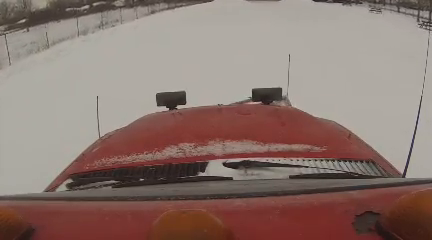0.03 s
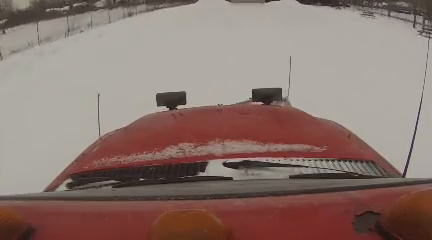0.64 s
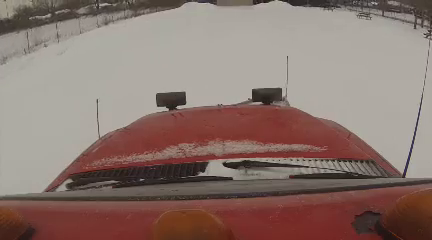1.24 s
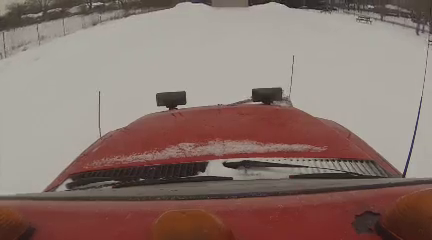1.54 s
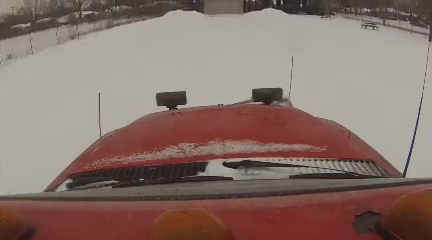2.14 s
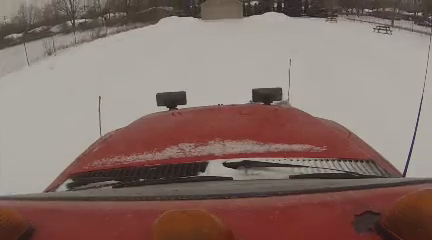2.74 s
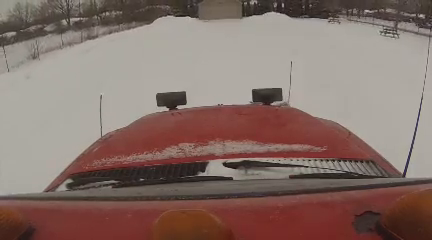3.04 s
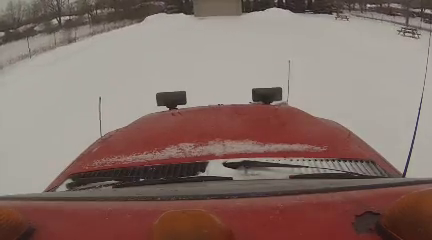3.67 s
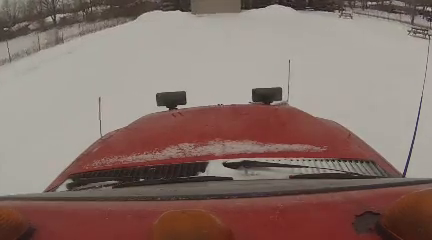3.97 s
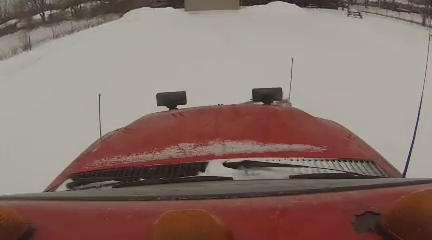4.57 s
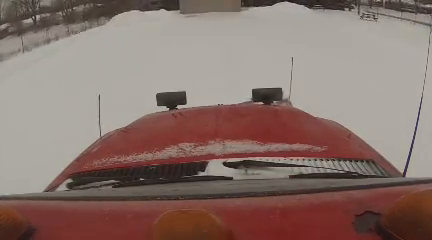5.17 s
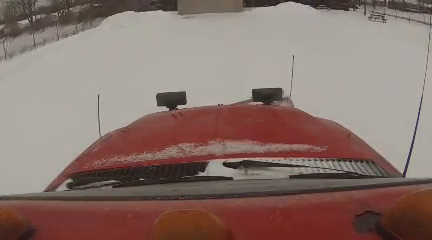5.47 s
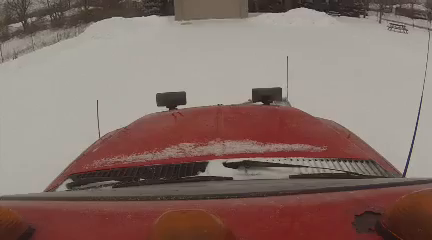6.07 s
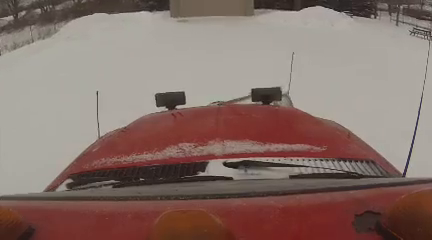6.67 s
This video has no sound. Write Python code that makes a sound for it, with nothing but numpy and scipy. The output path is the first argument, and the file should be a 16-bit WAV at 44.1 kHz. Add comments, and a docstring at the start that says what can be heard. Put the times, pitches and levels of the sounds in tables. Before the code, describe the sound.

A truck engine pulls under load with a throbbing exhaust and whining gears, shifts up, then eases off. Throughout, its plow blade drones and scrapes over packed snow, clanking and thudding at bumps, most often near the end. The microphone rides outdoors on the cab roof, which booms over the low chassis rumble, while a few ice grains tick against it.

```python
"""Snow plough from the cab roof

A plough truck pushes snow across an open lot; one microphone rides on the cab roof.
The engine pulls, shifts up and eases off, its exhaust throbbing under whining gears and a faint turbo.
Out in front the blade drones and scrapes over packed snow, and its mounting clanks at each jolt.
Right under the microphone the roof booms, the chassis rumbles below, and ice grains tick on the housing."""
import sys
import numpy as np
from scipy import signal
from scipy.fft import rfft, irfft, next_fast_len
from scipy.io import wavfile
from scipy.ndimage import uniform_filter1d

SR = 44100
rng = np.random.default_rng(int(sys.argv[2]) if len(sys.argv) > 2 else 0)


def transcribe(u):
    """Save the signal u as a 16-bit wav file named by the first command-line argument.

    u: samples, shape (n,) or (channels, n), limited to [-1, 1]; the rate is SR.
    q: integer samples, one column per channel.
    """
    v = np.clip(np.atleast_2d(u).T, -1, 1)
    q = np.round(v * 32767).astype(np.int16)
    wavfile.write(sys.argv[1], SR, q)


N = 304731
TIME = np.arange(N) / SR

# modes of the chassis: pitch_hz, width_hz, level_db
CHASSIS_MODES = [(55.94, 7.9, -1), (64.1, 12, -0.5), (73, 19, -16.5)]
# the blade's lesser modes: pitch_hz, width_hz, level_db
BLADE_MODES = [(160, 11, 1), (182.7, 13, -1.5), (204, 11, -1), (237, 17, -15), (285.8, 24, -16),
               (324, 100, -26)]


def engine(speed_wander=0.001):
    """Engine speed and load drive the exhaust, gears, intake and the roar of the bay."""
    # engine speed, climbing to the gear change and sagging after it: time_s, firing_hz
    speed = [(0, 116.1), (.25, 118.4), (.5, 121.3), (1.2, 124.9), (1.8, 127.9), (2.25, 131.3), (2.5, 130.5),
             (2.9, 110.5), (3.15, 104.9), (3.5, 104.7), (4.2, 104.2), (5.6, 102.6), (6.5, 96.5),
             (6.91, 94.26)]
    # engine load, as the level of the roar: time_s, level_db
    load = [(0, -37.5), (1.8, -38.4), (2.4, -36.5), (2.9, -38), (3.4, -38.5), (3.75, -39.5), (4.06, -38.5),
            (4.14, -42.5), (4.45, -45), (5.05, -48.5), (5.56, -45.5), (6.15, -47)]
    firing_hz, = in_time(speed)
    load_db, = in_time(load)
    easing_db = load_db - load_db.max()  # zero at full load
    firings = np.cumsum(firing_hz * (1 + speed_wander * drift(6.86))) / SR
    phase = 2 * np.pi * firings
    tones = exhaust(firing_hz, phase, easing_db) + gears(firing_hz, phase, easing_db) + intake(phase)
    return np.sqrt(2) * tones + from_db(load_db) * engine_bay(firings, easing_db)


def exhaust(firing_hz, phase, easing_db, level_db=-37, load_follow=2.1):
    """Tones of the firing rate, each lifted when it meets a resonance of the pipe."""
    # exhaust tones: firing_multiple, level_db
    orders = [(0.502, -20.5), (1, 0), (1.255, -30), (1.503, -7.5), (1.748, -17.5), (1.999, -1.5),
              (2.25, -24), (2.752, -26), (3.998, -31), (5, -24)]
    # pipe resonances: pitch_hz, half_width_hz, lift_db
    pipe = [(102.94, 4.1, 14), (124.34, 1.9, 10.5)]
    tones = 0
    for order, db in orders:
        pipe_db = sum(lift / (1 + ((order * firing_hz - hz) / width) ** 2) for hz, width, lift in pipe)
        tones += from_db(db + pipe_db) * np.sin(order * phase + 2 * np.pi * rng.random())
    return from_db(level_db + load_follow * easing_db) * tones


def gears(firing_hz, phase, easing_db, load_follow=0.74, waver_db=2.5, wobble_turns=0.028):
    """Each gear tone follows the engine and sings out as it passes a resonance of the casing."""
    # gear tones: firing_multiple, level_db
    orders = [(8.25, -3), (8.5, 0.5), (8.75, -3), (9.5, -4.5), (9.75, -9), (10, -8), (10.5, -1),
              (10.75, -8), (11, -4.5), (11.25, -7.5), (11.5, -2.5), (12, -5), (12.5, -7.5)]
    # casing resonances: pitch_hz, width_hz, level_db
    casing = [(1075, 30, -52), (1201, 16, -45.5), (1234, 34, -46), (1327, 21, -46.5), (1409, 65, -45.5),
              (1510, 44, -49.5), (1630, 110, -44)]
    whine = 0
    for order, db in orders:
        power = sum((from_db(peak_db) / (1 + (2 * (order * firing_hz - hz) / width) ** 2)) ** 2
                    for hz, width, peak_db in casing)
        gain = np.sqrt(power) * from_db(db + waver_db * drift(3.2))
        wobble = 2 * np.pi * (rng.random() + wobble_turns * drift(13))
        whine += gain * np.sin(order * phase + wobble)
    return from_db(load_follow * easing_db) * whine


def intake(phase):
    """The intake hums at three times the firing rate."""
    # swells of the hum: start_s, hold_s, level_db
    hums = [(-.1, 0.14, -41.5), (2.695, 0.091, -46), (5.707, 1, -41.5)]
    return swelling(hums, steady_db=-54, attack_s=0.08, release_s=0.3) * np.sin(3 * phase)


def engine_bay(firings, easing_db, throb=0.11, ring_follow=0.089, song_follow=0.95, flutter_db=3):
    """Fan and valve gear roar, pulsing with each firing; under load parts ring more and the intake sings."""
    # colour of the roar: frequency_hz, density_db
    colour = [(300, -11.5), (900, -11.5), (1160, -11.5), (1290, -1), (1500, 0), (1780, -7), (2380, -8),
              (2850, -19.5), (3850, -25.5), (5200, -22.5), (5850, -36.5), (6700, -25), (7500, -34.5),
              (14000, -50.5)]
    # ringing engine parts: pitch_hz, width_hz, level_db
    part_modes = [(1193, 16, -18), (1219, 13, -15), (1425, 40, -17.5), (1475, 130, -16.5), (1927, 140, -12),
                  (2271, 100, -14), (3416, 33, -23.5), (3514, 20, -29), (4044, 59, -29), (8530, 380, -37.5)]
    # the intake's song at full load: pitch_hz, width_hz, level_db
    song_mode = [(5060, 190, -23.5)]
    valves = from_db(-3) * valve_gear(firings / 8)  # eight firings to an engine cycle
    fan = rng.standard_normal(N)
    roar = from_db(-2) * coloured(valves + fan, colour)
    ringing = from_db(-0.3 + ring_follow * easing_db) * resonances(part_modes)
    song = from_db(song_follow * easing_db + flutter_db * drift(14)) * resonances(song_mode)
    return (roar + ringing + song) * (1 + throb * np.cos(2 * np.pi * firings))


def valve_gear(cycles, change_hz=0.95, size=1024, count=4):
    """A fine clatter comes round with every engine cycle; its pattern shifts while its level holds."""
    patterns = rng.standard_normal((count, size))
    shares = np.array([drift(change_hz) for _ in patterns])
    shares /= np.sqrt(np.sum(shares ** 2, axis=0))
    clatters = [np.interp(cycles % 1, np.arange(size) / size, pattern, period=1) for pattern in patterns]
    return rms_one(np.sum(shares * clatters, axis=0))


def blade_drone(pile_db_per_s=0.5, unsteady_db=2.34, judder_follow=0.31):
    """Dragging shakes the blade, harder as snow piles up before it."""
    # the blade grabs and judders: start_s, hold_s, level_db
    judders = [(0.326, 0.18, -30.5), (0.761, 0.23, -22.5), (1.26, 0.077, -19.5), (1.485, 0.23, -24),
               (1.977, 0.0096, -17), (2.254, 0.046, -19.5), (2.979, 0.14, -21), (3.207, 0.11, -20),
               (4.654, 0.21, -23.5), (4.726, 0.011, -19.5), (5.383, 0.19, -19), (6.588, 0.12, -17.5),
               (6.682, 0.02, -21.5)]
    # its main note: pitch_hz, width_hz, level_db
    main_mode = [(191.6, 5.4, .5)]
    drag_db = -29 + pile_db_per_s * TIME + unsteady_db * drift(5.1)
    shaking = swelling(judders, drag_db, attack_s=0.03, release_s=0.16)
    # friction keeps the main note going; the lesser modes swell less with each judder
    note = from_db(-3) * shaking * evened(resonances(main_mode), 0.02)
    lesser_gain = from_db(-4.5) * shaking.mean() * (shaking / shaking.mean()) ** judder_follow
    return note + lesser_gain * evened(resonances(BLADE_MODES), 0.076)


def edge_scrape(pile_db_per_s=1.0, lumpy_db=3):
    """The cutting edge rings as lumps of snow break under it, louder as the pile grows."""
    # the edge bites into packed snow: start_s, hold_s, level_db
    bites = [(0.424, 0.17, -42.5), (0.98, 0.021, -42.5), (1.276, 0.16, -42), (2.147, 0.49, -41),
             (2.729, 0.22, -39), (3.147, 0.21, -39), (3.488, 0.14, -56), (3.918, 0.27, -38.5),
             (4.506, 0.017, -37.5), (4.649, 0.068, -37), (4.875, 0.28, -41), (5.277, 0.19, -43),
             (6.521, 0.15, -54)]
    # modes of the edge: pitch_hz, width_hz, level_db
    edge_modes = [(418.6, 11, 2.5), (467, 38, 2), (590, 58, -12.5), (605.4, 19, -2), (666, 15, -6.5),
                  (819, 32, -10), (1296, 77, -7), (1470, 99, -4)]
    # snow rushing under the blade: frequency_hz, density_db
    snow_colour = [(40, 6), (110, 22), (240, 11.5), (330, 10), (400, -6.5), (520, -6.5), (750, -24),
                   (1000, -11.5), (2000, -15.5), (3700, -25.5), (7000, -41.5), (15000, -58)]
    biting = swelling(bites, steady_db=-50.5 + pile_db_per_s * TIME, attack_s=0.013, release_s=0.1)
    edge = from_db(-3) * evened(resonances(edge_modes), 0.035)
    snow = from_db(4) * noise(snow_colour)
    return biting * from_db(lumpy_db * drift(25)) * (edge + snow)


def push_frame():
    """The push frame groans on one low note under strain."""
    # groans: start_s, hold_s, level_db
    groans = [(1.277, 0.04, -22.5), (3.17, .04, -44), (4.398, 0.12, -27), (5.235, 0.059, -25),
              (5.433, 0.014, -28.5), (5.68, 0.086, -38.5), (6.38, 0.04, -27), (6.684, 0.04, -23.5)]
    # the frame's note: pitch_hz, width_hz, level_db
    frame_mode = [(140.6, 3.5, 0)]
    strain = swelling(groans, steady_db=-40, attack_s=0.03, release_s=0.16)
    return strain * evened(resonances(frame_mode), 0.03)


def jolts(thud_lag_s=0.011, thud_width_s=0.006, thud_hz=270, rattle_db=1, part_width_ratio=0.074):
    """The mounting clanks and rattles, a loose part rings, then the heavy frame answers with a thud."""
    # plough jolts: time_s, thud_db, clatter_db, clank_db, part_hz, part_db, width_s
    knocks = [(1.32, -17, -41, -40, 1900, -39, 0.011), (1.538, -34, -52, -48, 645, -38, 0.0087),
              (1.557, -29, -50, -37.5, 410, -38.5, 0.016), (2.187, -17, -52, -45, 600, -52, 0.0082),
              (4.994, -31, -53, -44, 671, -45.5, .022), (5.348, -41, -56, -46.5, 1280, -48, .022),
              (5.468, -15, -53, -48, 620, -45, 0.017), (5.594, -41, -45, -42, 1430, -43.5, 0.0086),
              (5.748, -37, -55, -48, 1483, -42, 0.014), (6.308, -30, -35, -37, 1476, -39, 0.0048),
              (6.323, -13, -38, -45, 3600, -54, 0.0065), (6.538, -14.5, -47, -49, 3720, -59, 0.0072),
              (6.555, -16.5, -43, -44, 2080, -40, 0.0095), (6.634, -10.5, -41.5, -56, 1520, -52, 0.014),
              (6.665, -20, -48, -58, 1750, -41, 0.0056), (6.699, -14, -43, -46, 1334, -54, 0.0097),
              (6.714, -13, -43, -41, 1880, -51, 0.015), (6.844, -22, -45, -52, 3730, -56, 0.0068)]
    # colour of the clatter: frequency_hz, density_db
    clatter_colour = [(200, 12), (500, 1), (950, 3), (1450, 9), (2400, -2.5), (3000, -10), (5200, -14.5),
                      (8000, -34), (14000, -43)]
    # modes of the blade mount: pitch_hz, width_hz, level_db
    mount_modes = [(437, 5.8, -5), (470, 95, -4), (630, 26, -4.5), (830, 70, -13)]
    thud, clatter, clank, parts = np.zeros((4, N))
    for time_s, thud_db, clatter_db, clank_db, part_hz, part_db, width_s in knocks:
        contact = np.exp(-0.5 * ((TIME - time_s) / width_s) ** 2)
        clatter += from_db(clatter_db) * contact
        clank += from_db(clank_db) * contact
        loose_part = evened(resonances([(part_hz, part_width_ratio * part_hz, 0)]), 0.017)
        parts += from_db(part_db) * contact * loose_part
        thud += from_db(thud_db) * np.exp(-0.5 * ((TIME - time_s - thud_lag_s) / thud_width_s) ** 2)
    frame = evened(resonances(CHASSIS_MODES) + resonances(BLADE_MODES), 0.01)
    mount = evened(resonances(mount_modes), 0.015)
    rattle = noise(clatter_colour) * from_db(rattle_db * drift(150))
    return thud * lowpass(frame, thud_hz, order=4) + clank * mount + parts + clatter * rattle


def cab(wander=0.023, waver_db=0.7, sway_hz=24, sway_width_hz=10, sway_db=-27):
    """The roof under the microphone flexes at its lowest resonance and booms over the sway of the cab."""
    # the roof's resonance: time_s, pitch_hz
    roof_pitch = [(0.0, 29.86), (0.42, 28.7), (1.99, 30.06), (2.8, 30.35), (2.92, 27.57), (3.24, 27.88),
                  (3.6, 30.22), (5.02, 30.05), (6.72, 26.01), (6.8, 27.1)]
    # booms: start_s, hold_s, level_db
    booms = [(0.313, 0.016, -20.5), (0.62, 0.5, -19.5), (1.31, 0.033, -11.5), (1.594, 0.016, -14),
             (1.843, 0.23, -14), (2.266, 0.25, -15.5), (3, 0.19, -17), (3.312, 0.59, -17),
             (3.462, 0.13, -12), (3.961, 0.16, -14), (4.643, 0.023, -15.5), (4.823, 0.47, -9.5),
             (5.444, .22, -17.5), (5.798, 0.022, -18.5), (6.176, 0.44, -21.5), (6.657, 0.084, -11)]
    hz, = in_time(roof_pitch)
    gain = swelling(booms, steady_db=-26, attack_s=0.051, release_s=0.18) * from_db(waver_db * drift(6.7))
    roof = np.sqrt(2) * gain * sine(hz * (1 + wander * drift(5.7)))
    return roof + resonances([(sway_hz, sway_width_hz, sway_db)])


def chassis(rumble_db=-32, uneven_db=2.5):
    """The chassis rumbles over uneven ground and heaves at each bump."""
    # the wheels hit bumps: start_s, level_db
    bumps = [(.66, -29), (.78, -26), (1.3, -19.5), (1.528, -21), (1.64, -23), (1.9, -30), (2.115, -31),
             (2.33, -30), (3.015, -24), (4.07, -27), (4.565, -24), (4.69, -30.5), (4.865, -21), (4.96, -41),
             (5.12, -23.5), (5.685, -23), (5.82, -23), (6.295, -13), (6.506, -12.5), (6.67, -22.5)]
    rumble = from_db(rumble_db + uneven_db * drift(4.6)) * evened(resonances(CHASSIS_MODES), 0.033)
    heave = sum(from_db(db) * swell(start_s, attack_s=0.023, hold_s=0.024, release_s=0.09)
                for start_s, db in bumps)
    return rumble + heave * evened(resonances(CHASSIS_MODES), 0.017)


def ice_grains(spot_t60_s=0.0059, bounce_s=0.0006, bounce_db=-13):
    """Grains strike the housing amid fine spray and bounce once; soft ones sound dull, each spot rings."""
    # grains: start_s, level_db, brightness_hz, spot_pitch_hz, spot_db
    grains = [(2.2, -43, 13000, 4400, -54), (2.241, -43, 13000, 3900, -45), (2.2942, -35, 11000, 3700, -33),
              (2.425, -40, 13000, 4400, -52), (2.492, -44, 13000, 4400, -54),
              (2.5028, -31.5, 13500, 4250, -34), (2.572, -34, 6500, 4000, -29),
              (2.659, -30.5, 18000, 4430, -37), (2.6715, -25, 19000, 3080, -29),
              (3.167, -41, 15000, 4400, -54), (3.181, -40, 17000, 4400, -50),
              (3.2301, -31.5, 14020, 3260, -26.5), (3.284, -48, 13000, 4400, -56),
              (4.3055, -48, 13000, 4360, -54), (4.677, -51, 12900, 4422, -58),
              (4.726, -56, 9000, 4450, -51), (5.554, -38, 12000, 3200, -36), (5.563, -41, 11950, 4180, -55),
              (5.702, -49, 13070, 4400, -58), (5.807, -50, 10910, 4400, -56),
              (5.881, -51, 11990, 4400, -52), (6.039, -45, 12000, 4397, -52), (6.13, -47, 13000, 4300, -49),
              (6.184, -47, 9040, 4230, -47), (6.232, -52, 8990, 4300, -52), (6.249, -48, 13000, 4150, -53)]
    hits, spots = np.zeros((2, N))
    length = SR // 20
    for start_s, db, bright_hz, spot_hz, spot_db in grains:
        lag = int(bounce_s * SR * (0.5 + rng.random()))
        clicks = signal.unit_impulse(length) + from_db(bounce_db) * signal.unit_impulse(length, lag)
        contact = lowpass(clicks, bright_hz, order=2)
        at = int(start_s * SR)
        hits[at:at + length] += from_db(db) * contact
        spots[at:at + length] += from_db(spot_db) * ring(contact, spot_hz, spot_t60_s)
    return spots + housing(hits + snow_spray())


def snow_spray(strays_per_s=4, level_db=-62.5, spread_db=6):
    """Fine snow lands as tiny random clicks, in showers with a few strays between."""
    # showers reaching the microphone: start_s, hold_s, grains_per_s
    showers = [(2.175, .03, 900), (2.392, .02, 1500), (2.47, .2, 121), (3.158, .03, 1100), (4.64, .03, 250),
               (5.84, .38, 322), (5.935, .04, 900)]
    per_s = strays_per_s + sum(rate * swell(start_s, attack_s=0.022, hold_s=hold_s, release_s=0.039)
                               for start_s, hold_s, rate in showers)
    sizes = from_db(level_db + spread_db * np.clip(rng.standard_normal(N), -2, 2))
    return (rng.random(N) < per_s / SR) * sizes


def housing(hits, crumble_db=-27, crumble_s=0.0031):
    """The microphone housing rings as each grain hits and crumbles."""
    # modes of the housing: pitch_hz, level_db, t60_s
    modes = [(2250, -5, 0.003), (5030, -1.5, 0.0025), (6750, -0.5, 0.0026), (8300, -1.5, 0.00077),
             (10900, -3, 0.0021), (12400, -8, 0.00056)]
    decay = np.exp(-1 / (crumble_s * SR))
    crumbs = from_db(crumble_db) * signal.lfilter([1], [1, -decay], hits + 1e-18)
    return sum(from_db(db) * ring(hits + crumbs * rng.standard_normal(N), hz, t60) for hz, db, t60 in modes)


def turbo(width_hz=140, trim_db=-1):
    """A breathy whistle that sinks with the boost."""
    # turbocharger running down: time_s, pitch_hz, level_db
    whistle = [(0, 7400, -66), (1.2, 6770, -76), (2.6, 7090, -77.5), (3.4, 7110, -69), (3.85, 6780, -67.5),
               (4.15, 6606, -69), (4.28, 6420, -71), (4.45, 6250, -86)]
    hz, db = in_time(whistle)
    return from_db(db + trim_db) * drift(width_hz) * sine(hz)


def hiss(level_db=-64.5):
    """An even background hiss with a thin whine on top."""
    # colour of the hiss: frequency_hz, density_db
    colour = [(2800, 0), (3700, 3), (4600, -6), (5300, -7.5), (5900, -11.5), (6800, -9.5), (7800, -14),
              (11000, -16.5), (14500, -28.5)]
    # the whine: pitch_hz, width_hz, level_db
    whine = [(11170, 170, -82.5)]
    return from_db(level_db) * noise(colour) + resonances(whine)


def from_db(db):
    """Decibels to gain."""
    return 10 ** (np.asarray(db) / 20)


def rms_one(x):
    """Scale to unit rms."""
    return x / np.sqrt(np.mean(x ** 2) + 1e-20)


def in_time(rows):
    """One curve for each column after the times."""
    times, *columns = np.transpose(rows)
    return [np.interp(TIME, times, column) for column in columns]


def sine(hz):
    """A sine that follows a pitch curve."""
    return np.sin(2 * np.pi * np.cumsum(hz) / SR)


def lowpass(x, hz, order):
    """Roll off the treble above hz."""
    return signal.sosfilt(signal.butter(order, hz, fs=SR, output="sos"), x)


def drift(rate_hz):
    """Random wander of rms 1, mostly slower than rate_hz."""
    size = next_fast_len(N)
    hz = np.fft.rfftfreq(size, 1 / SR)
    return rms_one(irfft(rfft(rng.standard_normal(size)) / (1 + (hz / rate_hz) ** 2), size)[:N])


def coloured(drive, spectrum):
    """Give an excitation a colour, rolled off below its first point; rms 1."""
    size = next_fast_len(N)
    hz = np.fft.rfftfreq(size, 1 / SR) + 1
    points_hz, db = np.transpose(spectrum)
    gain = from_db(np.interp(np.log(hz), np.log(points_hz), db)) / np.sqrt(1 + (points_hz[0] / hz) ** 6)
    return rms_one(irfft(rfft(drive, size) * gain, size)[:N])


def noise(spectrum):
    """Noise of the given colour, rms 1."""
    return coloured(rng.standard_normal(N), spectrum)


def resonances(modes):
    """Each mode is shaken at random and rings at its own level."""
    out = 0
    for hz, width, db in modes:
        r = np.exp(-np.pi * width / SR)
        resonator = [1 - r, 0, r - 1, 1, -2 * r * np.cos(2 * np.pi * hz / SR), r * r]
        octave = [hz / np.sqrt(2), min(hz * np.sqrt(2), SR / 2 - 100)]
        skirts = signal.butter(1, octave, "band", fs=SR, output="sos")
        ringing = signal.sosfilt(np.vstack([resonator, skirts]), rng.standard_normal(N + SR))
        out += from_db(db) * rms_one(ringing[SR:])  # one second to build up
    return out


def evened(x, seconds):
    """Hold a vibration at unit level, keeping its fast beating."""
    return x / np.sqrt(uniform_filter1d(x ** 2, max(int(seconds * SR), 2)) + 1e-12)


def ring(clicks, hz, t60_s):
    """A unit click sets a sine of height 1 ringing."""
    r, w = from_db(-60 / (t60_s * SR)), 2 * np.pi * hz / SR
    return signal.lfilter([0, np.sin(w)], [1, -2 * r * np.cos(w), r * r], clicks + 1e-18)


def swell(start_s, attack_s, hold_s, release_s):
    """Attack, hold and release of height 1."""
    return np.interp(TIME, start_s + np.cumsum([0, attack_s, hold_s, release_s]), [0, 1, 1, 0])


def swelling(rows, steady_db, attack_s, release_s):
    """Gain of a steady vibration to which each row (start_s, hold_s, level_db) adds its power."""
    power = sum((from_db(db) * swell(start_s, attack_s, hold_s, release_s)) ** 2
                for start_s, hold_s, db in rows)
    return np.sqrt(from_db(steady_db) ** 2 + power)


def scene():
    """Everything rides on the one truck, at a fixed distance from the microphone, in open air."""
    truck = engine() + blade_drone() + edge_scrape() + push_frame() + jolts() + cab() + chassis()
    return (truck + ice_grains() + turbo() + hiss())[None]


def record(dry, fade_s=0.003, cutoff_hz=15200):
    """Peaks are rounded slightly, the ends are faded and the top is cut."""
    fade = np.clip(np.minimum(TIME, TIME[-1] - TIME) / fade_s, 0, 1)
    rounded = 2 * np.tanh(dry / 2) * fade
    return signal.sosfilt(signal.ellip(10, 0.1, 80, cutoff_hz, fs=SR, output="sos"), rounded)


dry = scene()
out = record(dry)
transcribe(out)
```